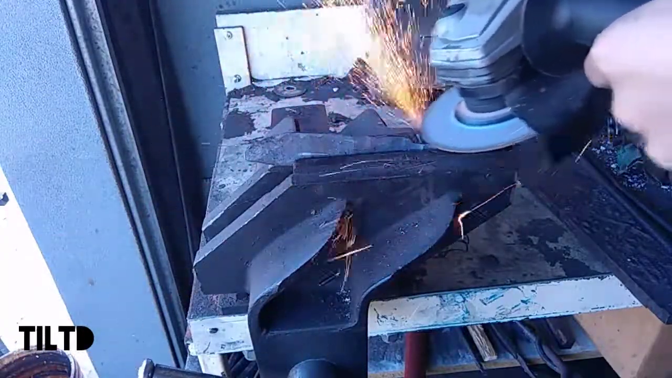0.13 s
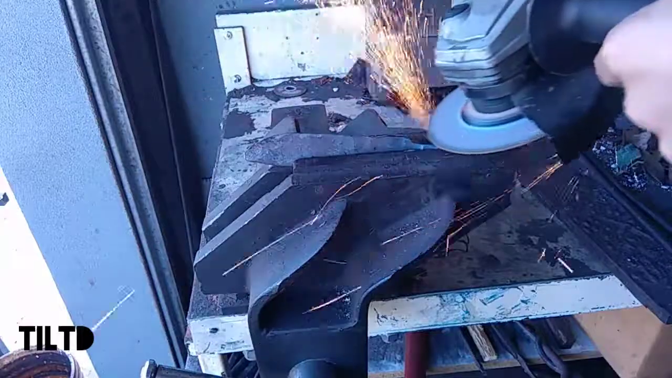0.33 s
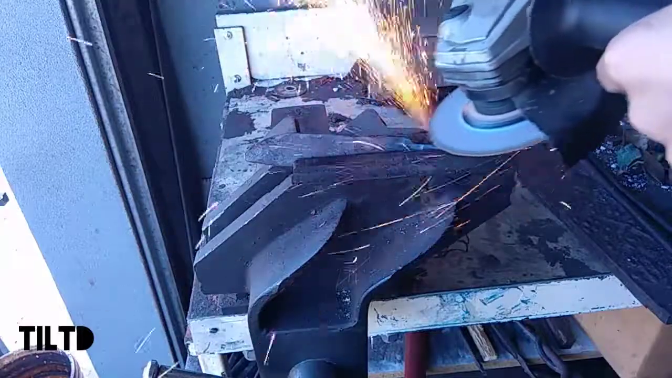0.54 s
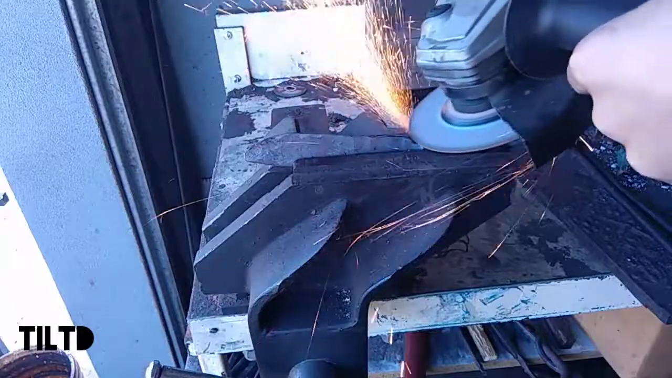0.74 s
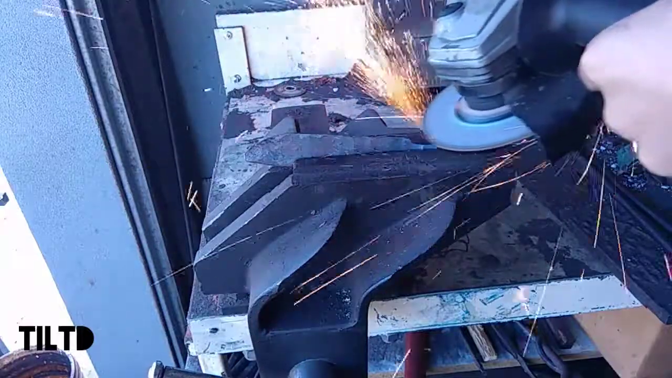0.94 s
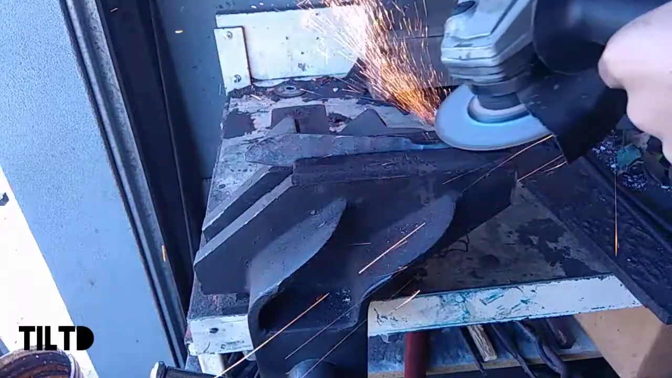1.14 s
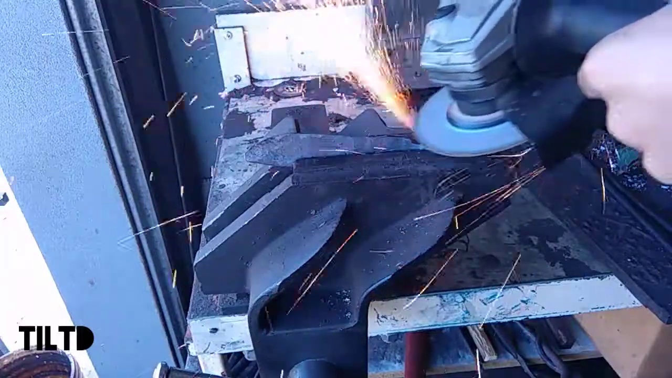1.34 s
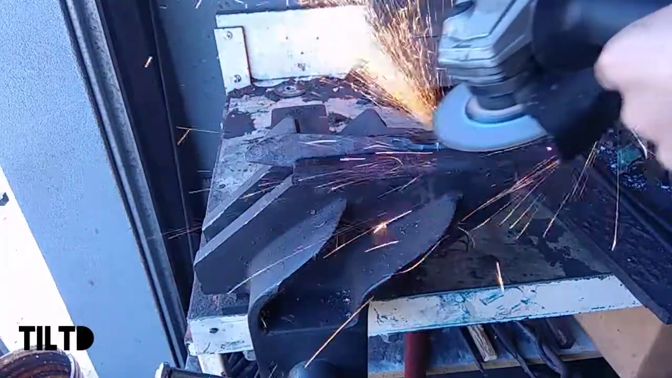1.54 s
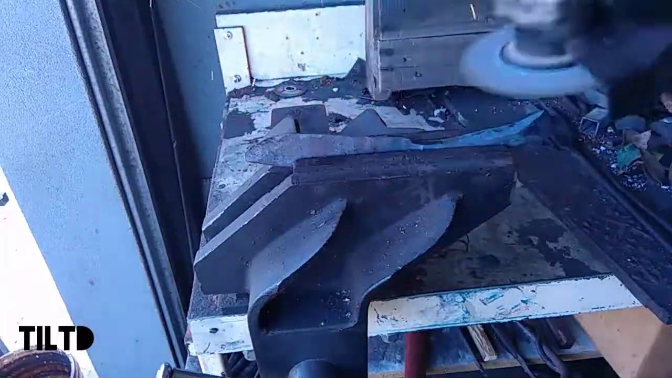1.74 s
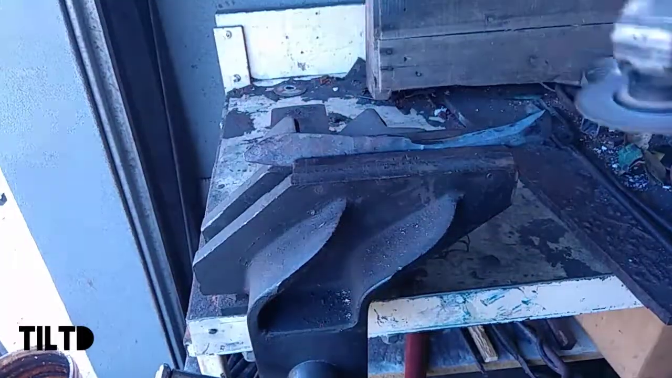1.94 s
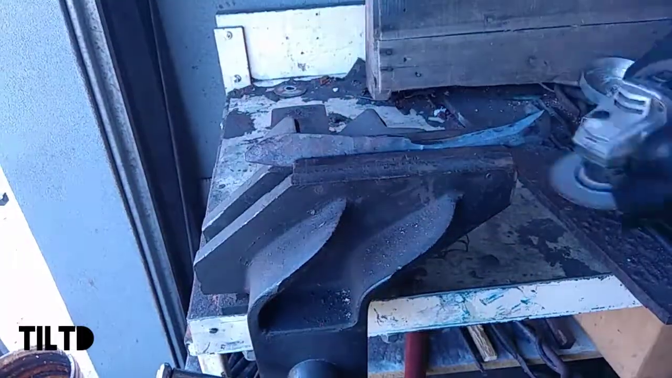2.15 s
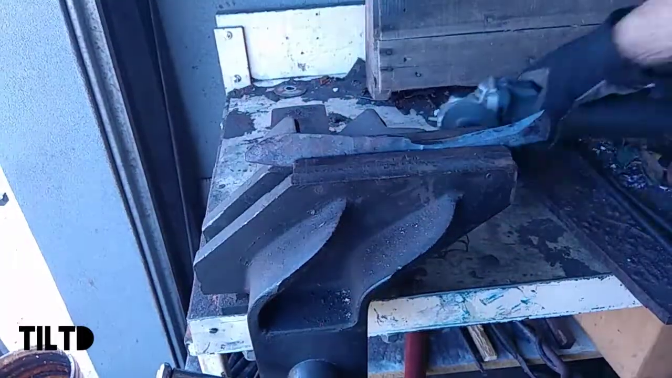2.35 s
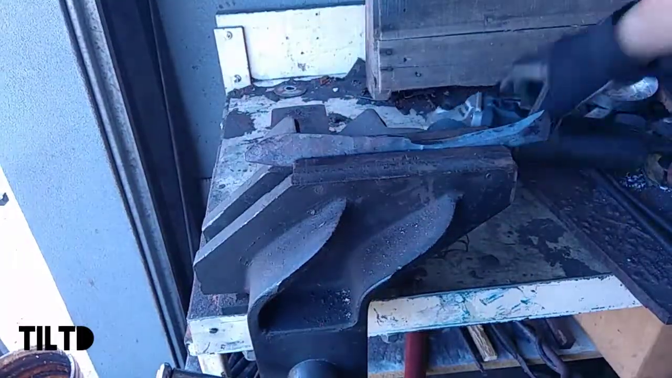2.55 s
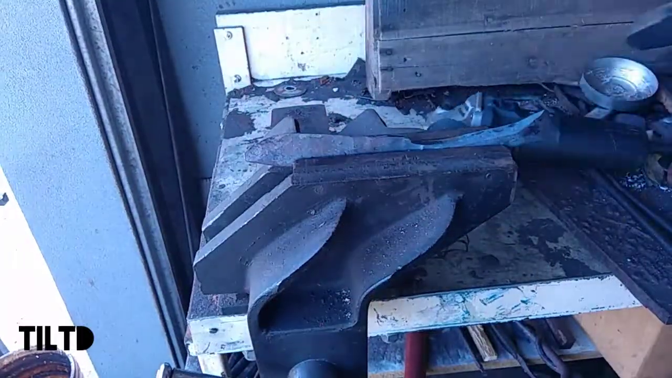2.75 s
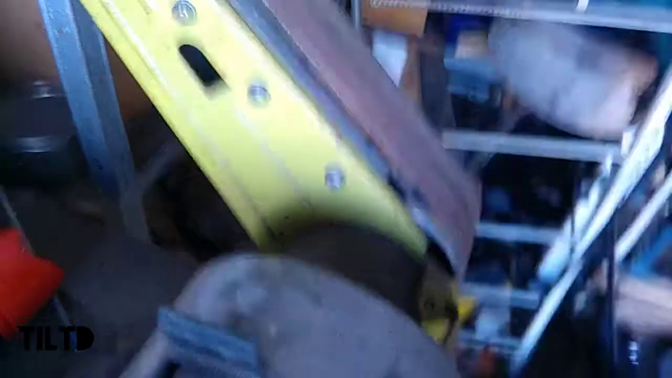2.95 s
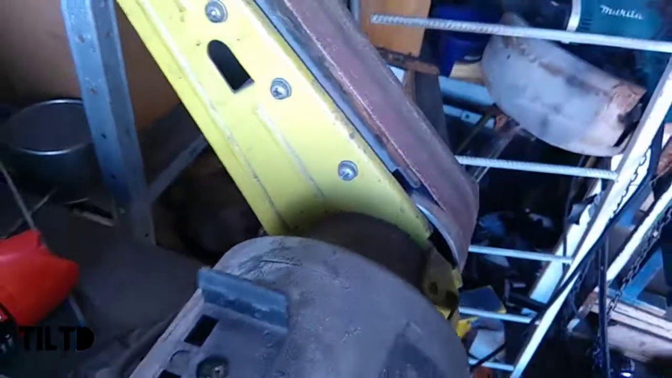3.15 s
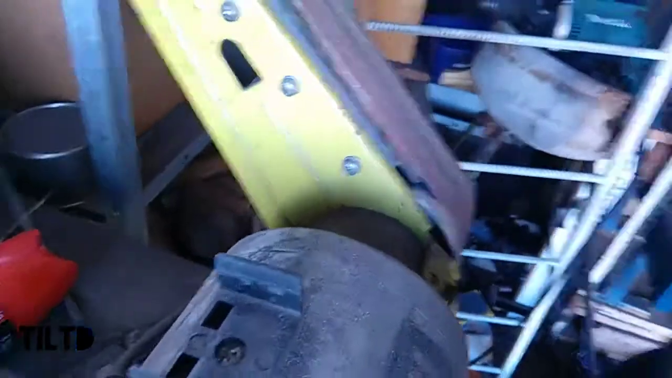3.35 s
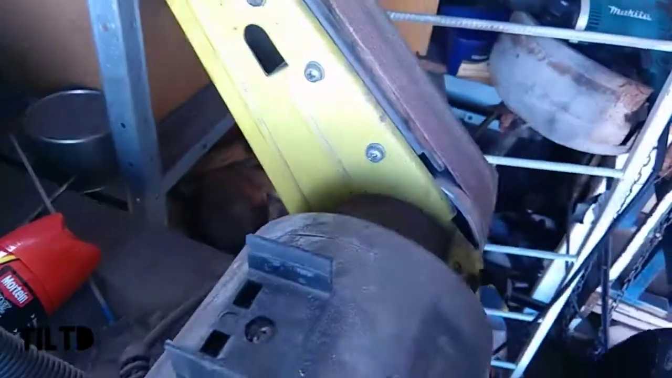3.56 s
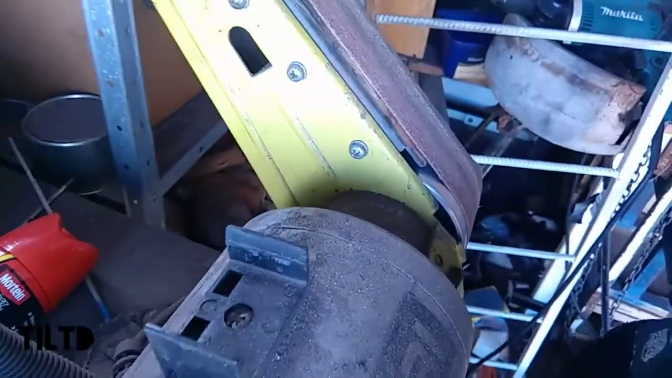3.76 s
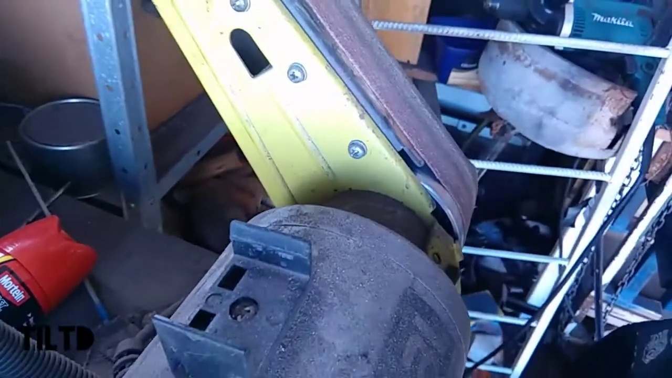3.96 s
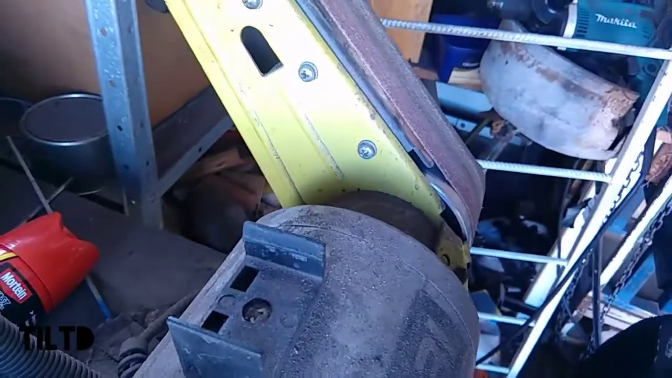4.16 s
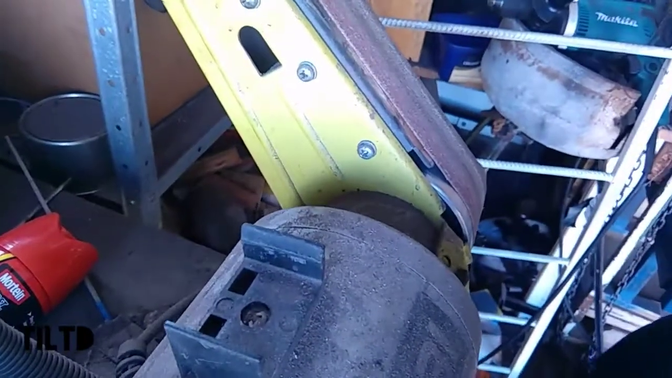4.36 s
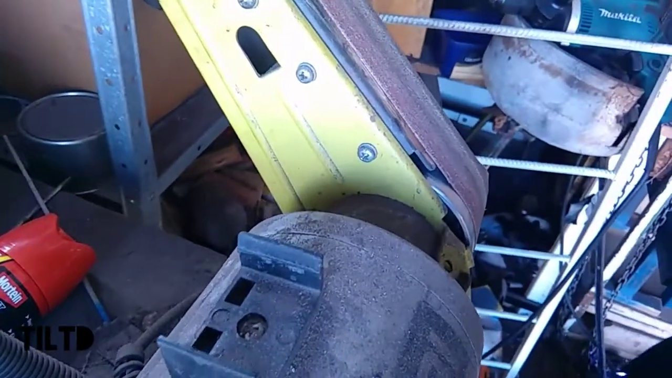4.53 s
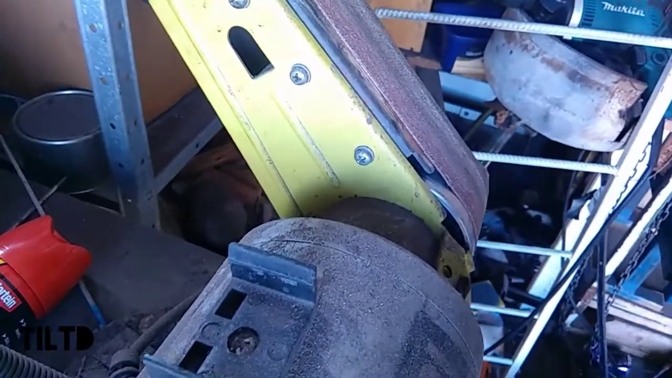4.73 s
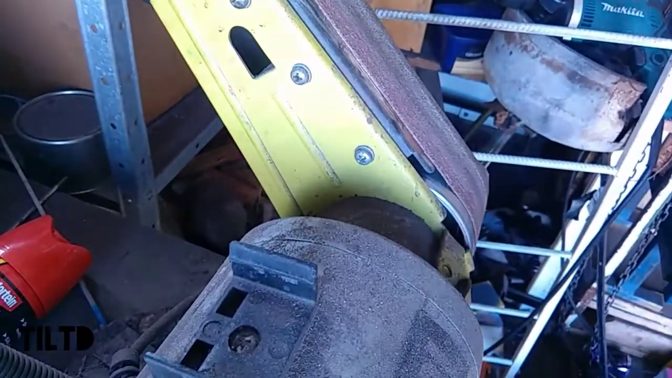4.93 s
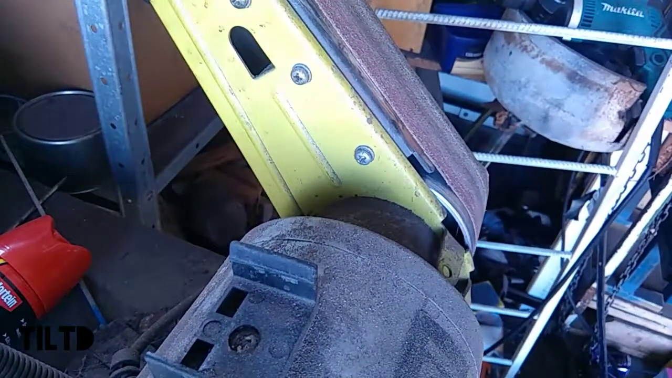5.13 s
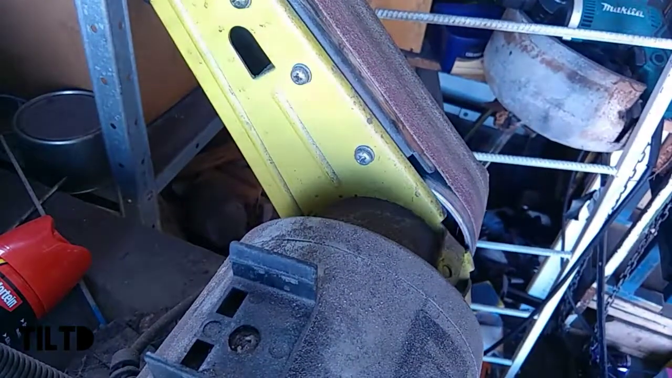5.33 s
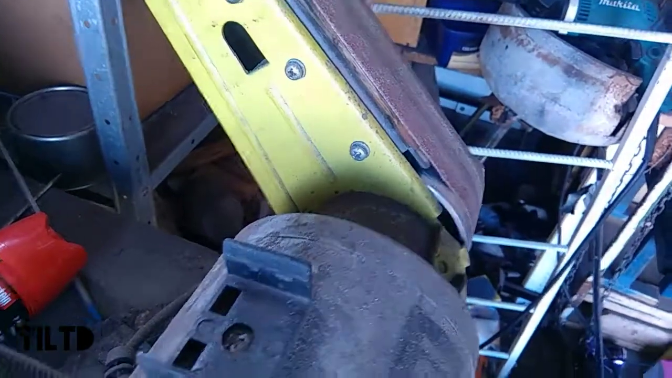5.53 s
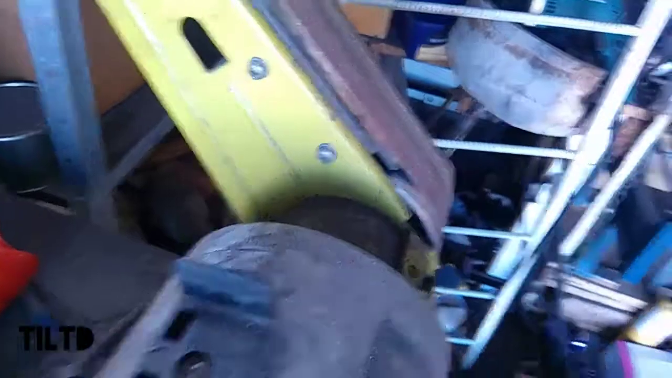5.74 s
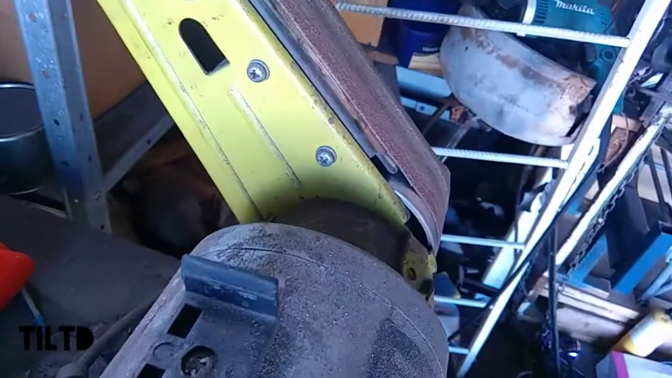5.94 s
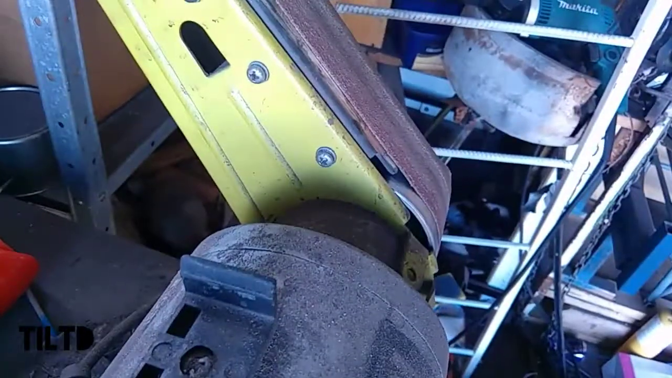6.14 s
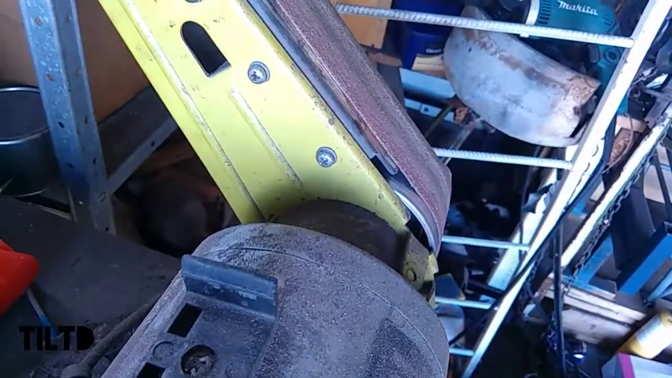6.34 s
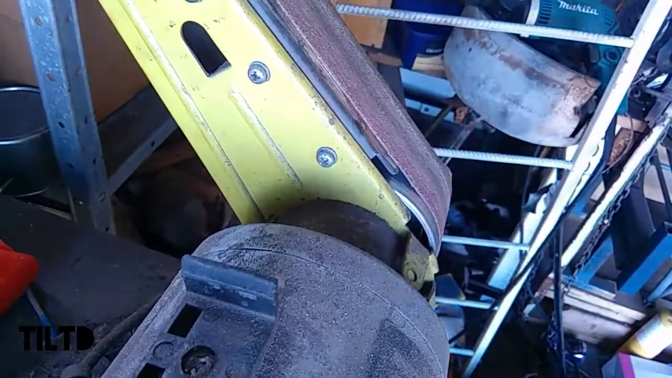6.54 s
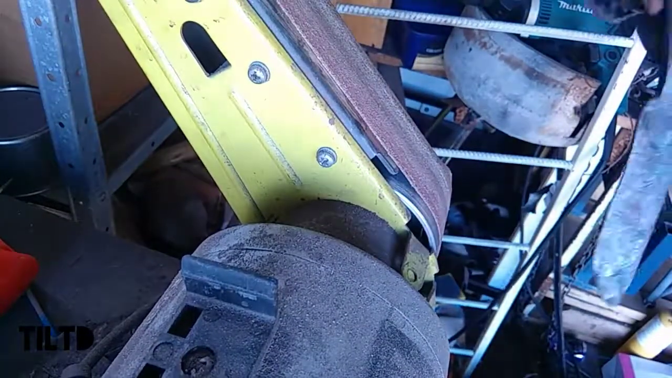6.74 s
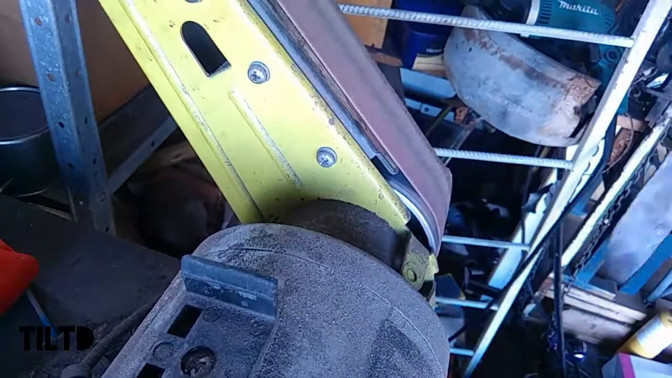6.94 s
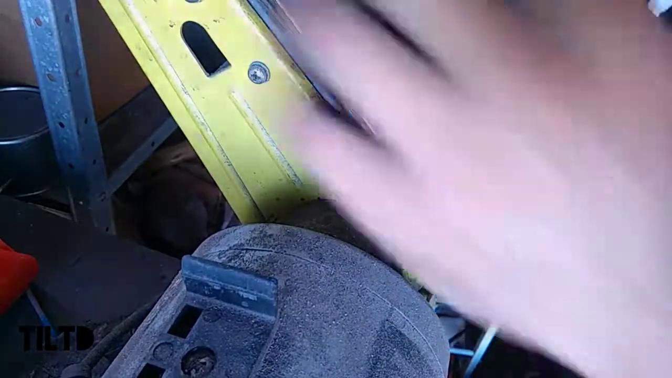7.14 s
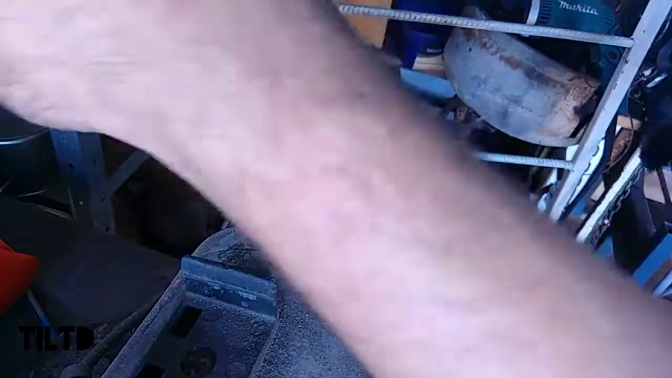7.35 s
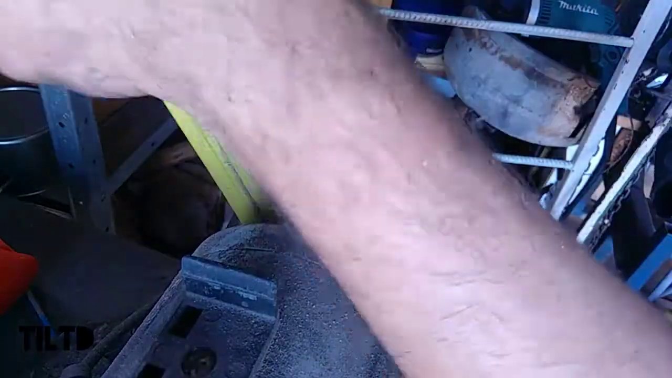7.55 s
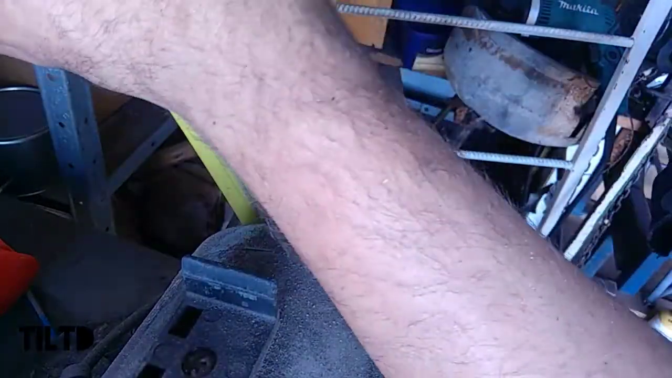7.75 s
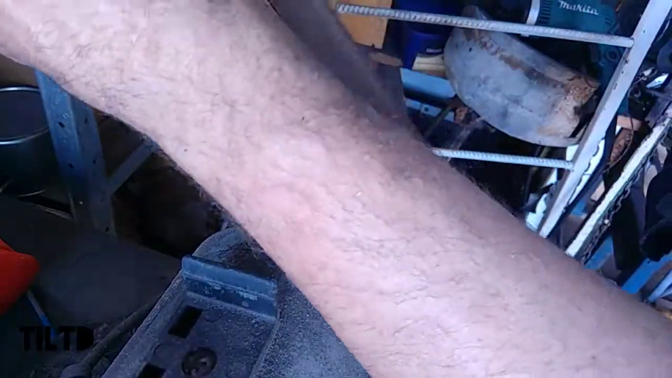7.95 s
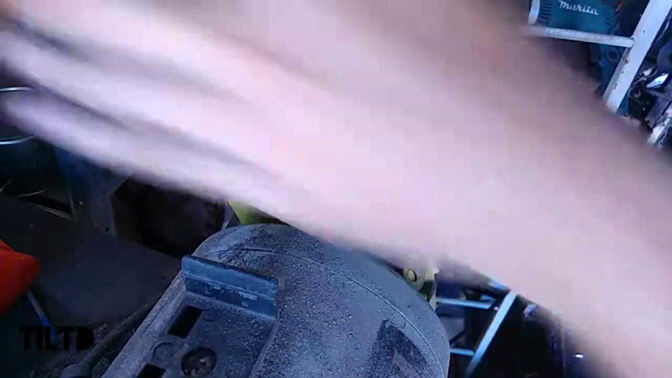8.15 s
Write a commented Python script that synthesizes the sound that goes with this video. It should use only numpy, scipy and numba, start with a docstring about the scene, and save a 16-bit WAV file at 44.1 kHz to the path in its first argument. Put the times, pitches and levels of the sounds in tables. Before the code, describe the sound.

An angle grinder scrapes harshly on a steel blade, making it ring. It lifts off and its high whine begins to fall, then cuts abruptly to a quiet workshop with a faint low drone, sharp close knocks and soft rubbing of fingers and cloth. A switch snaps, and a belt grinder hums, then hisses and rumbles up to speed. Loud, dull thuds of a hand on a housing finish it.

```python
"""First comes the harsh scrape of an angle grinder: its gritty disc makes a steel blade in a vise ring.
It lifts off, is switched off, and its fan and gears fall in pitch. The scene changes abruptly to a quiet
workshop with a far drone, knocks on a mount, and rubbing fingers and cloth. A switch snaps and a belt
grinder hums, then hisses and rumbles up to speed. Last, a hand bumps a housing with dull thuds."""
import sys
import numpy as np
from scipy import signal
from scipy.fft import rfft, irfft, next_fast_len
from scipy.io import wavfile
from scipy.ndimage import uniform_filter1d, map_coordinates
from numba import njit

SR = 44100
rng = np.random.default_rng(int(sys.argv[2]) if len(sys.argv) > 2 else 0)


def put_to_file(sound):
    """Save the sound as 16-bit audio at rate SR, in the file named by the first command-line argument."""
    columns = np.atleast_2d(sound).T  # one column per channel
    safe = np.clip(columns, -1, 1)
    whole_steps = np.round(safe * 32767)
    wavfile.write(sys.argv[1], SR, whole_steps.astype(np.int16))


N = 365586
T = np.arange(N) / SR

# Levels in the tables are relative: they set which parts are louder than others.
# disc pressing on the steel: t/s, grinding level/dB, level of the blade's edge within it/dB
DISC_CONTACT = [(0.0, -25.5, -18.5), (0.05, -23, -12), (0.13, -23.5, -22.5), (0.18, -22.5, -14.5),
                (0.222, -22.5, -20), (0.232, -25.5, -18.5), (0.29, -22, -15), (0.338, -21.5, -21),
                (0.402, -23.5, -15), (0.426, -23.5, -22), (0.518, -19.5, -16), (0.532, -25, -16),
                (0.562, -22, -22), (0.692, -24, -16), (0.716, -21, -8.5), (0.808, -24, -8),
                (0.832, -19, -8), (0.86, -22, -9), (0.94, -26, -12.5), (0.954, -21, -7.5),
                (1.012, -23, -14), (1.176, -23.5, -10), (1.25, -20.5, -10), (1.26, -24, -9),
                (1.32, -22, -12), (1.424, -21.5, -11), (1.536, -22.5, -8), (1.612, -20.5, -11.5),
                (1.638, -24.5, -10), (1.714, -22.5, -10.5)]
# tone of the scraping grit: f/Hz, level/dB
GRIT_TONE = [(24, -50.5), (40, -16.5), (113, -5.5), (309, -10.5), (696, -4), (1010, -13), (2160, -6.5),
             (3050, -11), (3810, -6), (5380, -11.5), (8170, 1.5), (11000, -4.5), (14400, -28.5)]
# notes the blade and vise ring at: f/Hz, width/Hz, first level/dB, settled level/dB
BLADE_RINGS = [(679, 42, -5, -6.5), (1193, 40, -17.5, -1.5), (1640, 50, -15.5, -15.5), (2000, 90, -13, -10),
               (2153, 90, 0, -3.5), (2510, 110, -7.5, -3), (2680, 60, -4.5, -17.5), (3400, 33, -2, -8),
               (3540, 60, -9, -2), (3798, 57, -12, 4), (3960, 120, -3, -9.5), (4242, 32, -8.5, -8),
               (4980, 70, -8.5, -7), (5800, 43, -10, 2), (6150, 59, -5, -1), (6400, 52, -9, -2.5),
               (7050, 77, 6.5, -18), (7640, 170, -8, -3), (8040, 100, 10, 3.5), (8330, 150, -3, 0),
               (8920, 52, -8, -1), (9270, 170, -0.5, -0.5), (10430, 150, -4.5, -1), (10600, 190, 7, -9),
               (11000, 120, 1, -6)]
# wobble of the disc: multiple of its turning speed, level/dB
DISC_WOBBLE = [(1, 4.5), (2, 3.5), (3, -19.5), (4, -2.5), (5, -10.5), (6, -4.5), (7, 0.5), (8, -20),
               (9, -11.5), (10, 0.5)]
# tone of the rattling gears: f/Hz, level/dB
GEAR_TONE = [(24, -44.5), (40, -18.5), (93, -6.5), (193, -14.5), (228, -14), (385, -7), (550, -6),
             (1330, -9.5), (1930, -9.5), (2650, -7), (6000, -18), (7800, -47.5), (13200, -120)]
# notes of the gear case: f/Hz, width/Hz, level facing us/dB, level swung away/dB
CASE_RINGS = [(1332, 92, 3, 0.5), (2350, 130, -0.5, -13.5), (2595, 150, -3, -6.5), (3100, 140, -10.5, -3.5),
              (3370, 230, 1, -7.5), (3660, 200, 2, -6.5), (4250, 110, -9.5, -7), (5330, 200, -10.5, -19)]
# tone of the rushing air: f/Hz, level/dB
AIR_TONE = [(2650, -36.5), (4500, -17), (5110, -6.5), (5570, -6.5), (8130, -1), (9340, 3), (12000, 1.5),
            (15600, -28.5), (22000, -120)]
# fan whine while grinding: t/s, f/Hz
WHINE_LOADED = [(0.0, 13870), (0.56, 13460), (0.606, 13270), (0.694, 13550), (1.568, 13570), (1.6, 13690)]
# fan whine running free, then coasting down: t/s, f/Hz, level/dB
WHINE_COASTING = [(1.88, 15700, -72), (2.03, 14200, -39), (2.055, 14130, -32), (2.1, 13710, -41),
                  (2.17, 13040, -40), (2.26, 12320, -32.5), (2.31, 11850, -61), (2.37, 11440, -39),
                  (2.43, 11000, -46), (2.504, 10464, -31.5), (2.55, 10100, -39.5), (2.72, 9090, -41),
                  (2.83, 8360, -44), (2.865, 8220, -54), (2.93, 7670, -52)]
# echoes off the bench and walls: delay/s, level/dB
WHINE_ECHOES = [(.0031, -10), (.0058, -1), (.0097, -11), (0.014, -13)]
# notes of the gear teeth: multiple of the motor's turning speed, level/dB
TOOTH_NOTES = [(5, -12), (6, -13), (7, -0.5), (8, -12), (9, -3), (10, -6), (11, -1.5), (12, -27), (18, -20)]
# dull bumps through the housing: t/s, peak level/dB, f/Hz, fade time/s
HOUSING_BUMPS = [(2.478, -35.5, 89.9, 0.14), (2.812, -34, 71.5, 0.029), (3.269, -37, 88.8, 0.055),
                 (3.531, -32, 62.6, 0.029), (3.685, -35.5, 147, 0.058), (3.871, -26.5, 106, 0.019),
                 (4.077, -36, 101.7, 0.058), (4.659, -41, 129, 0.058), (5.489, -40.5, 65, 0.077),
                 (5.719, -45, 70.0, 0.06), (5.736, -29.5, 138, 0.028), (8.179, -8, 141, 0.042),
                 (8.207, -15.5, 83, 0.098), (8.227, -18, 136, 0.064), (8.246, -19, 64.6, 0.026),
                 (8.267, -22, 56.5, 0.12)]
# far drone: t/s, f/Hz, level/dB
FAR_DRONE = [(2.97, 61, -41.5), (3.09, 64.2, -38.5), (3.55, 62.9, -42.5), (3.88, 62.4, -41.5),
             (3.98, 60.1, -45), (4.46, 61.1, -42.5), (4.8, 61.4, -46.5), (5.13, 59.94, -47.5),
             (5.7, 60.3, -43.5), (6.05, 59.8, -49.5), (6.17, 59.4, -43), (6.52, 58.9, -48),
             (6.7, 55.6, -45)]
# notes in the drone: multiple of its pitch, level/dB
DRONE_NOTES = [(1, 0), (2, -15.5), (3, -18), (4, -24.5)]
# tone of the still room: f/Hz, level/dB
ROOM_TONE = [(18, -18), (30, -13), (70, -1), (106, -4), (377, -17), (501, -21.5), (777, -21), (840, -18),
             (1560, -28), (13300, -39), (14400, -37)]
# swells of the room's rumble: t/s, level/dB
RUMBLE_SWELLS = [(2.95, 0.5), (3.38, 12.5), (3.7, 6), (4.19, 3.5), (4.69, -0.5), (5.37, 1), (5.71, 4.5),
                 (5.98, 1), (6.3, 3.5), (6.8, 2)]
# knocks on the mount: t/s, level/dB, crack level/dB, hardness/(dB per octave), fade time/s,
# contact time/s, then low, hollow and bright ring level/dB
MOUNT_KNOCKS = [(2.9875, -9, -27.5, -2, 0.025, 0.0077, 3, 0, -4),
                (2.9994, -12, -29, -6, 0.014, 0.0048, -2.5, 0, 8),
                (3.0455, -6, -28, -2, 0.04, 0.0036, -15, 1.5, -1),
                (3.057, -10, -56, -9, 0.052, 0.0035, -7, -2, 3),
                (3.066, -15.5, -55, -7, 0.036, 0.0022, -8, 14, -2),
                (3.091, -42, -20, 2, 0.03, .003, -8, -6, -8),
                (3.279, -17.5, -9, 11, 0.034, 0.0032, 5, -6, 3),
                (3.2825, -12.5, -23, -0.5, 0.057, 0.0038, -3, 5, 6.5),
                (4.032, -17, -19, 3, 0.047, 0.0041, 3.5, -10, 2),
                (5.6374, -24.5, -5, 9, 0.02, 0.0026, 11, -6, -3),
                (5.675, -43, -12, -3, 0.026, 0.0019, 3, 0, 0),
                (5.7331, -15, -1.5, 1.5, 0.036, 0.0018, -2.5, -1.5, -0.5),
                (5.856, -50, -16, 5, 0.035, 0.0019, 0, -2, 0), (6.139, -46, -14, 5, 0.028, .002, 6, -6, -1),
                (6.154, -40, -6, 4.5, 0.017, .001, 3, -8, -3)]
# notes the mount rings at: f/Hz, level/dB, share of the knock's fade time
MOUNT_RINGS = [(553, -1.5, 0.49), (666, -5.5, 1), (769, 6, 0.88), (984, -4.5, 0.77), (1000, 0.5, 0.23),
               (1490, 2, 0.33), (1990, -7, 0.11), (2624, -11.5, 0.44), (3150, -18.5, 0.45),
               (4180, -12.5, 0.18), (4580, -22, 0.3)]
# fingers and cloth rubbing, and last a low burst as the belt grinder's frame bumps: t/s, length/s, level/dB,
# f/Hz, width/Hz
FINGER_RUBS = [(2.996, 0.015, -45, 1100, 2407), (3.092, 0.047, -52, 800, 600),
               (3.335, .016, -53.5, 1500, 3500), (3.394, 0.018, -53.5, 925.9, 2130),
               (3.495, 0.021, -50.5, 830, 1852), (3.515, 0.035, -43, 520, 620),
               (3.566, 0.014, -39, 736, 1590), (3.586, 0.019, -44, 740, 1650),
               (3.674, 0.058, -53, 380, 537), (3.805, 0.1, -53, 459, 537), (3.879, 0.042, -50, 590, 780),
               (5.211, 0.11, -69, 9990, 4040), (5.498, 0.06, -35.5, 1740, 1660),
               (5.494, 0.089, -47.5, 447, 545), (5.485, .02, -43.5, 1800, 2520),
               (5.481, 0.048, -50.5, 5850, 9000), (5.557, 0.042, -48.5, 1852, 2778),
               (5.678, 0.028, -58, 1202, 1852), (5.903, 0.031, -56, 1648, 2330),
               (5.932, 0.061, -68, 2500, 2970), (6.048, 0.023, -55, 1810, 2315),
               (4.656, 0.024, -56, 376, 402), (5.504, .025, -65, 1660, 1200),
               (6.425, 0.052, -54, 2900, 2000), (6.425, 0.043, -60, 950, 500),
               (6.804, 0.027, -58, 1331, 1194), (6.659, .04, -65, 3990, 4890),
               (7.13, 0.054, -51.5, 4000, 900), (7.52, 0.034, -38, 1290, 500),
               (8.177, 0.098, -30, 219, 350)]
# a sleeve moving: t/s, half length/s, level/dB
SLEEVE_SWISHES = [(6.207, .015, -65), (6.33, .04, -64), (6.437, .035, -56.5), (6.52, .02, -67),
                  (6.613, 0.029, -64.5), (6.697, 0.024, -67), (6.812, 0.017, -64.5)]
# the switch closing, its bounce, the starter dropping out: t/s, level/dB, fade time/s
SWITCH_CLICKS = [(6.835, -28.5, 0.11), (6.849, -34.5, 0.045), (7.317, -32, .02)]
# tone of those clicks: f/Hz, level/dB
CLICK_TONE = [(180, -23), (300, -4), (903, -19), (1400, 5), (1590, -24), (2030, -6), (3350, -13.5),
              (7180, -13), (9300, -8), (14400, -25)]
# hum of the mains power in the motor: f/Hz, level/dB
MAINS_NOTES = [(100, -10.5), (200, -1.5), (300, -17), (400, -19), (500, -14.5)]
# tone of the hissing belt: f/Hz, level/dB
BELT_TONE = [(710, -31), (1200, -5), (1960, -3.5), (2430, 0.5), (2790, -0.5), (3500, -1), (4010, -1.5),
             (5530, -6), (6600, 4.5), (7480, -5), (9300, 5.5), (11600, 2), (14400, -7)]
# notes the rollers ring at: f/Hz, width/Hz, level/dB
ROLLER_RINGS = [(1140, 190, -11), (2524, 33, 6.5), (3200, 57, -1.5), (3980, 140, 0), (4440, 110, 0),
                (5100, 69, -5), (6730, 130, -11), (7820, 82, 4.5)]
# tone of the rumbling frame: f/Hz, level/dB
FRAME_TONE = [(24, -45), (40, -12), (86, -11), (124, -6), (182, -7.5), (216, -14), (242, -3.5), (288, -12),
              (378, -5), (520, -9), (812, -20), (1120, -12.5), (1800, -23.5), (2340, -20), (3960, -120)]
# buzzes of the belt guard: t/s, level/dB
GUARD_BUZZES = [(7.021, -34.5), (7.15, -34.5), (7.235, -34), (7.46, -32), (7.52, -35)]
# left-right spread of the angle grinder: f/Hz, level/dB
GRINDER_SPREAD = [(60, -33.5), (300, -35.5), (1200, -38), (2800, -55.5), (3600, -52), (5000, -7.5),
                  (7000, -15.5), (10000, -39.5), (12500, -8), (14000, -9)]
# left-right spread of the belt grinder and handling sounds: f/Hz, level/dB
LATER_SPREAD = [(60, -43), (300, -48), (1200, -44.5), (2800, -52), (3600, -44), (5000, -7), (7000, -8),
                (10000, -31), (12500, -5.5), (14000, 2)]

LIFT_S, SWUNG_S, SCENE_CHANGE_S = 1.73, 2.01, 2.928  # angle grinder lifts off, swings away, is gone
ON_S, GRIP_S, AT_SPEED_S = 6.835, 7.022, 7.519  # belt grinder is on, gathers speed, is up to speed


def undb(db):
    """Turn decibels into a number to multiply by."""
    return 10 ** (np.asarray(db) / 20)


def unit(x):
    """Scale x to an average strength (RMS) of 1."""
    return x / np.sqrt(np.mean(x ** 2))


def between(ends, share):
    """Blend from the first end (share 0) to the second (share 1)."""
    return ends[0] + (ends[1] - ends[0]) * share


def curves(table):
    """Join a table's points over time, one curve for each column after the first."""
    s, *columns = np.transpose(table)
    return [np.interp(T, s, c) for c in columns]


def gate(t0, t1, rise=.004, fall=.004):
    """Fade in from t0 and out by t1, in seconds."""
    return np.clip((T - t0) / rise, 0, 1) * np.clip((t1 - T) / fall, 0, 1)


def hump(s, half_s, db):
    """A bell-shaped swell around time s."""
    return undb(db) * np.exp(-.5 * ((T - s) / half_s) ** 2)


def decay(fade_s, seconds=.3):
    """Times, and a curve that drops 60 dB in fade_s (5 ms at the shortest)."""
    t = np.arange(int(seconds * SR)) / SR
    return t, np.exp(-np.log(1000) * t / max(fade_s, .005))


def add(out, s, x):
    """Mix x into out at time s."""
    i = int(s * SR)
    out[i:i + len(x)] += x[:N - i]


def noise():
    """Plain white hiss."""
    return rng.standard_normal(N)


def walk(rate):
    """A smooth random wander of about 1 either way, with rate new values a second."""
    k = int(SR / rate)
    steps = np.repeat(rng.standard_normal(N // k + 1), k)
    return 1.51 * uniform_filter1d(uniform_filter1d(steps, k), k)[:N]


def angle(hz):
    """Angle reached, in radians, at hz turns a second."""
    return 2 * np.pi * np.cumsum(hz) / SR


def colour(x, table):
    """Shape the tone of x with points of f/Hz, level/dB."""
    size = next_fast_len(N)
    hz, db = np.transpose(table)
    bins_hz = np.arange(size // 2 + 1) * SR / size
    gain = undb(np.interp(np.log(bins_hz + 1), np.log(hz), db))
    return irfft(rfft(x, size) * gain, size)[:N]


@njit
def moving_band(x, hz, width):
    """Keep the part of x near a moving pitch (a band-pass filter)."""
    y, mid, low = np.empty(len(x)), 0., 0.
    for i in range(len(x)):
        g, damping = np.tan(np.pi * hz[i] / SR), width / hz[i]
        v = (mid + g * (x[i] - low)) / (1 + g * (g + damping))
        mid, low, y[i] = 2 * v - mid, low + 2 * g * v, damping * v
    return y


def band(x, hz, width):
    """Keep the part of x near a steady pitch."""
    return moving_band(x, np.full(len(x), float(hz)), float(width))


def rings(x, peaks, flicker_db, rate, drift=0.):
    """Notes that x sets ringing; each flickers by itself, and drift lets its pitch wander."""
    out = 0
    for hz, width, db in peaks:
        wander = walk(rate)
        ring = moving_band(x, hz * (1 + drift * wander[::-1]), float(width))
        out += undb(db + flicker_db * wander) * ring
    return out


def patchy(x, flicker_db, rate):
    """Split x into bands a third of an octave wide and let each flicker."""
    return rings(x, [(hz, hz / 4, 0) for hz in 45 * 2 ** (np.arange(26) / 3)], flicker_db, rate)


def disc_grit(turns, keep, size=512):
    """Grit round the rim: each turn partly meets the same grains again, the rest are new."""
    grit = rng.standard_normal((int(turns[-1]) + 2, size))
    grit = signal.lfilter([np.sqrt(1 - keep ** 2)], [1, -keep], grit, axis=0).ravel()
    return unit(map_coordinates(grit, [turns * size], order=3))


def grinding(disc):
    """Grit scrapes harder once each disc turn and makes the steel ring, until the disc lifts off."""
    rim_hz, jaw_hz, jaw_db = (11430, 10340), (4440, 3670), (-16, -19)  # at first, settled
    settled = 1 - np.exp(-T / .65)  # the contact slides along the blade
    contact_db, edge_db = curves(DISC_CONTACT)
    scrape = disc_grit(disc / (2 * np.pi), keep=.54)
    scrape *= undb((1.3 + 1.2 * walk(25)) * np.cos(disc) + .8 * walk(80) + .8 * walk(45))
    rim = undb(2.5 * np.cos(disc) + 3.2 * walk(40))
    rim *= moving_band(scrape, between(rim_hz, settled) + 180 * walk(18), 450.)
    wobble = sum(undb(db + 1.6 * walk(13)) * np.sin(k * disc) for k, db in DISC_WOBBLE)
    blade = [(hz, width, between(db, settled)) for hz, width, *db in BLADE_RINGS]
    grind = unit(colour(patchy(scrape, 2.8, 50), GRIT_TONE)) + undb(-4.5) * unit(rim)
    grind += undb(-1.2) * unit(rings(scrape, blade, 2.4, 30, drift=.007))
    jaw = unit(moving_band(scrape, between(jaw_hz, settled), 110.))
    grind += undb(between(jaw_db, settled) + 2.4 * walk(22)) * jaw
    edge_hz, edge_width_hz = 6130, 750
    edge = [(edge_hz, edge_width_hz, 0)]
    edge_gain = undb(edge_db + 3 * walk(30))
    grind += edge_gain * unit(rings(rings(scrape, edge, 0, 9), edge, 0, 14, drift=.02))
    return (undb(contact_db) * unit(grind) + undb(-52) * wobble) * gate(-1, LIFT_S + .0084, fall=.034)


def gear_rattle(disc, case):
    """The gears rattle and make their case ring."""
    rattle = noise() * undb(np.cos(disc) + 1.2 * walk(45) + 1.5 * walk(300))
    body = unit(colour(patchy(rattle, 2.5, 24.96), GEAR_TONE))
    return body + undb(-4) * unit(rings(rattle, case, 5, 35, drift=.007))


def fan_air(octaves):
    """Air rushes and the vents hiss, both fading as the motor coasts down."""
    rush = undb(-36 + 15.5 * octaves) * unit(colour(patchy(noise(), 2.7, 30), AIR_TONE))
    vents = undb(-42.5 + 14 * octaves) * unit(colour(noise(), [(10500, -25.5), (12000, -1)]))
    return rush + vents


def fan_whine(blade_angle, coast_db, freed):
    """Passing fan blades whine; after lift-off, echoes make the falling note swell and dip."""
    loaded_db = -40 + 1.2 * walk(8)
    whine = undb(between((loaded_db, coast_db), freed) + 1.3 * walk(40)) * np.sin(blade_angle + walk(120))
    for s, db in WHINE_ECHOES:
        add(whine, s, undb(db) * freed * whine)
    return undb(-1) * whine


def gear_teeth(rotor, case):
    """Meeting teeth sing after lift-off; each note swells as it falls through a note of the case."""
    notes = sum(undb(db + 4.5 * walk(15)) * np.sin(k * rotor + 1.2 * walk(80)) for k, db in TOOTH_NOTES)
    return (undb(-13) * notes + rings(notes, case, 1.5, 10)) * gate(LIFT_S, 9, rise=.2)


def motor_shake(rotor_hz, octaves):
    """The off-balance motor shakes more at speed, and most where its housing rings."""
    housing_hz, width_hz = 390, 140
    housing = 1 / (1 + (2 * (rotor_hz - housing_hz) / width_hz) ** 2)
    return housing * undb(-39.5 + 12 * octaves + 2.6 * walk(25)) * np.sin(angle(rotor_hz) + .4 * walk(40))


def angle_grinder():
    """One motor turns fan, gears and disc; it speeds up when lifted, then coasts down."""
    fan_blades, gear_ratio, spin_up_s = 31, 3.695, .07
    freed = 1 - np.exp(-np.maximum(T - LIFT_S, 0) / spin_up_s)
    coast_hz, coast_db = curves(WHINE_COASTING)
    octaves = np.log2(coast_hz / coast_hz[0])  # 0 until it coasts, then negative
    rotor_hz = between((curves(WHINE_LOADED)[0], coast_hz), freed) / fan_blades
    rotor = angle(rotor_hz)
    disc = rotor / gear_ratio
    swung = gate(SWUNG_S, 9, rise=.03)
    case = [(hz, width, between(db, swung)) for hz, width, *db in CASE_RINGS]
    gear_gain = undb(-41 + 8 * octaves)
    out = grinding(disc) + gear_gain * gear_rattle(disc, case) + fan_air(octaves)
    out += undb(-6) * gear_gain * gear_teeth(rotor, case)
    out += fan_whine(fan_blades * rotor, coast_db, freed) + freed * motor_shake(rotor_hz, octaves)
    return out * gate(-1, SCENE_CHANGE_S, fall=.00068)


def bumps():
    """Each bump shakes a housing: one low note that dies quickly."""
    out = np.zeros(N)
    for s, db, hz, fade_s in HOUSING_BUMPS:
        t, fade = decay(fade_s)
        onset = np.sin(np.pi / 2 * np.clip(2.14 * t * hz, 0, 1)) ** 2
        thud = onset * fade * np.sin(2 * np.pi * hz * t)
        add(out, s, -undb(db) * thud / np.abs(thud).max())
    return out


def workshop():
    """A far drone wavers over room rumble; the hiss on top differs left and right."""
    hz, db = curves(FAR_DRONE)
    drone = sum(undb(g + .47 * walk(5.7)) * np.sin(k * angle(hz)) for k, g in DRONE_NOTES)
    air, side = (undb(-55) * unit(colour(noise(), ROOM_TONE)) for _ in range(2))
    rumble = colour(air, [(1200, -6.5), (3000, -32)]) * (undb(curves(RUMBLE_SWELLS)[0]) - 1)
    side = colour(side, [(2500, -56), (4500, -7), (8000, -2)])
    mid = air + rumble + undb(db) * drone * gate(0, 7, fall=.22)
    return np.array([mid + side, mid - side]) * gate(SCENE_CHANGE_S, 9, rise=.084)


def knocks():
    """Each knock cracks and rings the mount; a harder blow brings out the higher notes."""
    out = np.zeros(N)
    i = np.arange(600)  # samples of one contact
    chance = rng.standard_normal((len(MOUNT_KNOCKS), 2, len(MOUNT_RINGS)))
    chatter = rng.standard_normal((len(MOUNT_KNOCKS), len(i)))
    for knock, (detune, scatter), rough in zip(MOUNT_KNOCKS, chance, chatter):
        s, db, crack_db, hardness, fade_s, touch_s, low_db, hollow_db, bright_db = knock
        spot_db = {0: low_db, 2: hollow_db, 5: bright_db}  # three notes depend on where it lands
        ring = 0
        for k, (hz, note_db, share) in enumerate(MOUNT_RINGS):
            t, fade = decay(fade_s * share, .15)
            gain = undb(note_db + spot_db.get(k, 0) + 2.4 * scatter[k] + hardness * np.log2(hz / 760))
            ring += (-1) ** k * gain * fade * np.sin(2 * np.pi * hz * (1 + .02 * detune[k]) * t)
        # the contact is a brief chatter plus one push, which lasts longer for a softer blow
        contact = undb(-7.5) * rough * np.exp(-(i / SR / touch_s) ** 3)
        push = 1 + .6 * max(-hardness, 0)
        contact += 6 / push * np.exp(-((i - 30) / push) ** 2)
        ring = np.convolve(ring, contact)
        add(out, s, undb(db) * ring / np.abs(ring).max())
        crack = band(rough * np.exp(-i / SR / (.54 * touch_s)), hz=2400, width=3400)
        add(out, s, undb(db + crack_db) * crack)
    # nearby shelves scatter each knock into a short tail
    tail = decay(.035, .06)[1] * rng.standard_normal(int(.06 * SR))
    return out + undb(-11.5) * signal.fftconvolve(out, tail / np.linalg.norm(tail))[:N]


def rubs():
    """Fingers and cloth rub in short, grainy strokes; a last low burst is the belt grinder's frame bumping."""
    out = np.zeros(N)
    grains = noise() * undb(1.8 * walk(250))
    for s, length_s, db, hz, width in FINGER_RUBS:
        size = int(length_s * SR)
        rub = grains[int(s * SR):][:size]
        rub = band(band(rub, hz, width), hz, width)
        stroke = np.sin(np.pi * np.linspace(0, 1, size) ** .55) ** .67
        add(out, s, undb(db) * unit(rub) * stroke)
    return out


def sleeve():
    """A moving sleeve makes soft, high swishes."""
    cloth = noise() * undb(2 * walk(120))
    hiss = unit(band(band(cloth, hz=10500, width=7570), hz=10500, width=8800))
    return sum(hump(*row) for row in SLEEVE_SWISHES) * hiss


def switch():
    """The switch snaps and bounces, and later the starter drops out: three bursts of noise."""
    bursts = np.zeros(N)
    for s, db, fade_s in SWITCH_CLICKS:
        add(bursts, s, undb(db) * decay(fade_s)[1])
    return bursts * unit(colour(noise(), CLICK_TONE))


def mains_hum():
    """The straining motor hums with the mains power, then the hum fades."""
    fade_from_s, fade_db_per_s = 7.22, 96
    hum = sum(undb(db + 1.6 * walk(14)) * np.sin(2 * np.pi * hz * T + hz / 900 * walk(30))
              for hz, db in MAINS_NOTES)
    return hum * undb(-35 - fade_db_per_s * np.maximum(T - fade_from_s, 0))


def belt_and_frame(speed):
    """The belt hisses, its rollers ring and the frame rumbles, all louder with speed."""
    grit = noise() * undb(.5 * walk(60))
    belt = unit(colour(patchy(grit, 1.6, 30), BELT_TONE))
    belt += undb(-10) * unit(rings(grit, ROLLER_RINGS, 1.5, 17))
    frame = unit(colour(patchy(noise(), 2.2, 25), FRAME_TONE))
    return undb(between((-56, -29.5), speed)) * belt + undb(between((-44.5, -32), speed)) * frame


def whirr(speed):
    """Two narrow bands of noise climb with the speed and die away near the top."""
    hz, fade_from_s, fade_db_per_s = between((245, 820), speed), 7.43, 500
    db = between((-51, -31), speed) - fade_db_per_s * np.maximum(T - fade_from_s, 0)
    return undb(db + 1.5 * walk(25)) * sum(unit(moving_band(noise(), k * hz, 55.)) for k in (1, .75))


def guard_buzz():
    """The belt guard buzzes in short fits at one low pitch."""
    return sum(hump(s, .018, db) for s, db in GUARD_BUZZES) * unit(band(noise(), hz=273, width=27))


def pulley():
    """The turning pulley hums, rising in pitch and level until it settles."""
    glide_from_s, settle_s, pitch_hz, rise_db_per_s = 7.38, .3, (104.2, 138.8), 80
    settled = 1 - np.exp(-np.maximum(T - glide_from_s, 0) / settle_s)
    turn = angle(between(pitch_hz, settled))
    db = -35.5 + rise_db_per_s * np.minimum(T - AT_SPEED_S - .08, 0) + 2.2 * walk(30)
    return undb(db) * (np.sin(turn) + undb(-5.5) * np.sin(3 * turn))


def belt_grinder():
    """The switch starts the motor, which pulls the belt up to speed."""
    speed = np.clip((T - GRIP_S) / (AT_SPEED_S - GRIP_S), 0, 1)
    clicks = switch()
    running = belt_and_frame(speed) + mains_hum() + whirr(speed) + guard_buzz() + pulley()
    return clicks + running * gate(ON_S, 9, rise=.028)


def scene():
    """Mix everything in stereo; a small, shifting share differs between left and right."""
    grinder = angle_grinder()
    later = belt_grinder() + bumps() + knocks() + rubs() + sleeve()
    shift = unit(walk(120))
    side = colour(grinder * shift, GRINDER_SPREAD) + colour(later * shift, LATER_SPREAD)
    return np.array([grinder + later + side, grinder + later - side]) + workshop()


def record(dry):
    """Steeply remove the treble above 14400 Hz."""
    return signal.sosfilt(signal.ellip(14, .3, 75, 14400, fs=SR, output="sos"), dry)


dry = scene()
out = record(dry)
put_to_file(out)
```